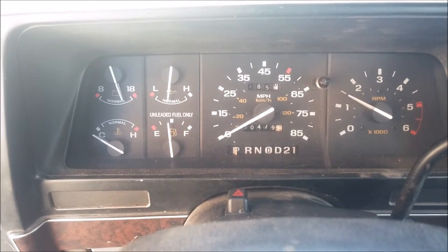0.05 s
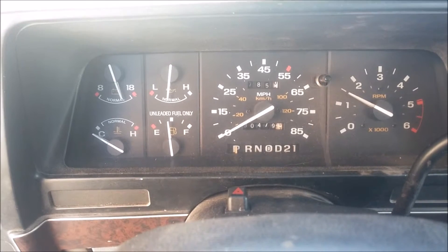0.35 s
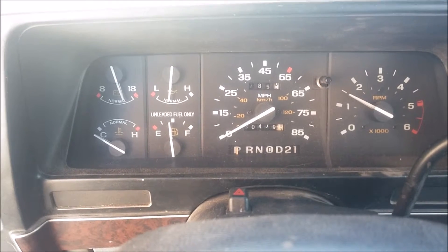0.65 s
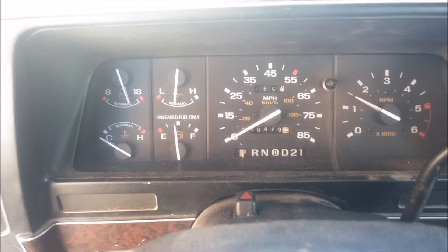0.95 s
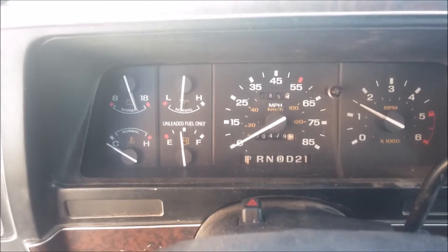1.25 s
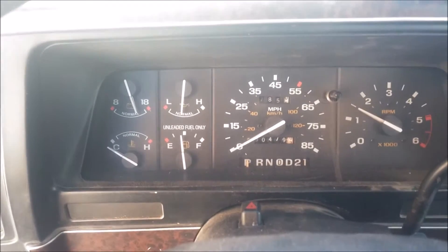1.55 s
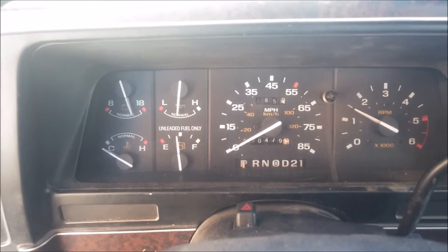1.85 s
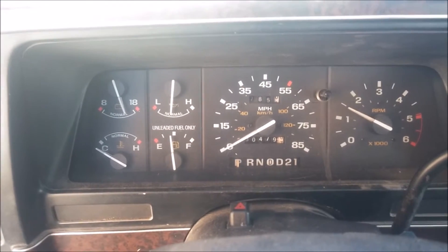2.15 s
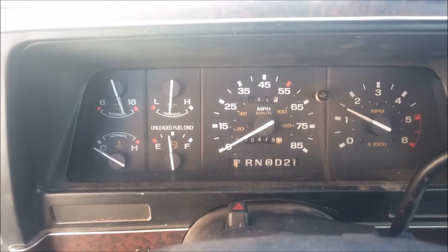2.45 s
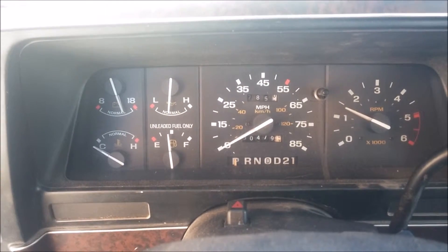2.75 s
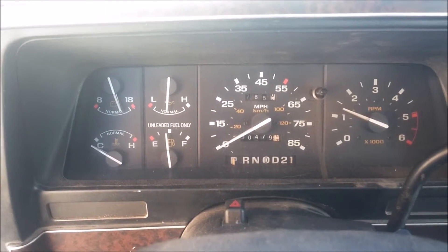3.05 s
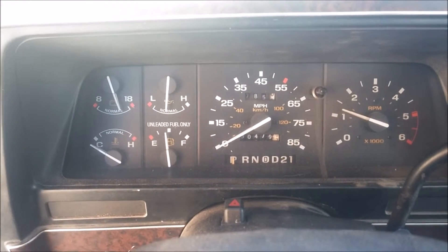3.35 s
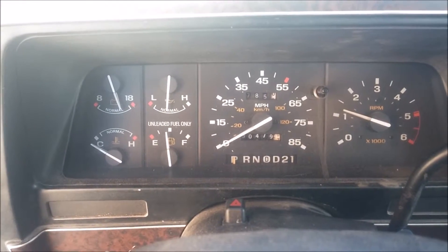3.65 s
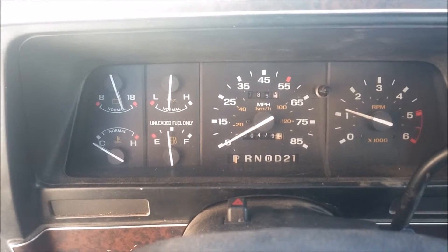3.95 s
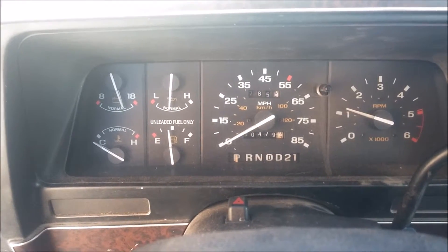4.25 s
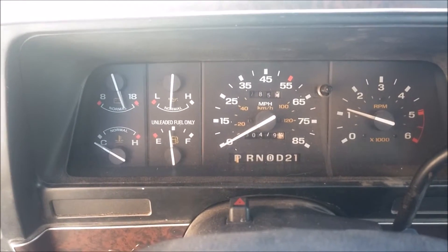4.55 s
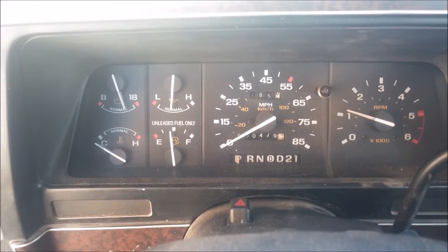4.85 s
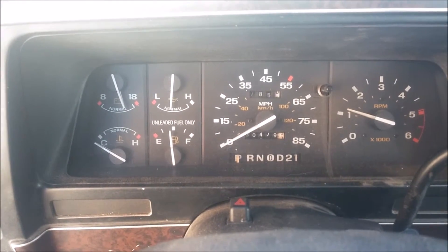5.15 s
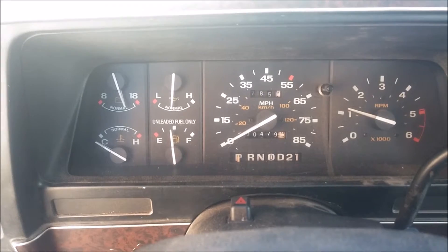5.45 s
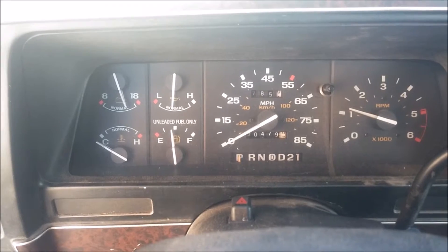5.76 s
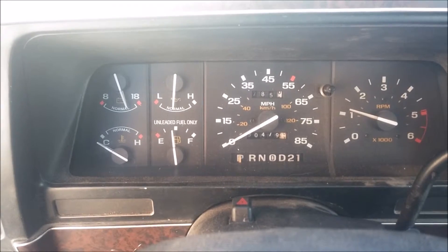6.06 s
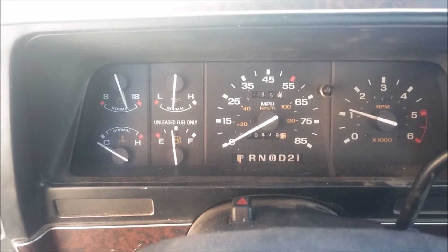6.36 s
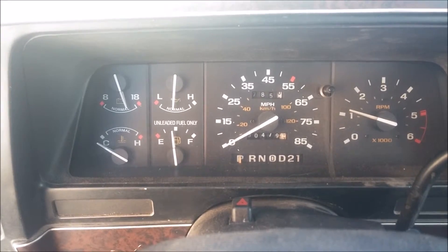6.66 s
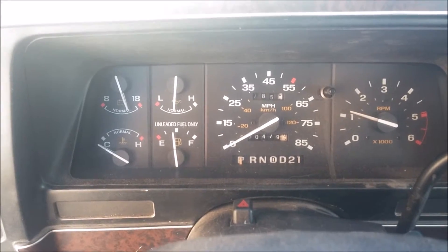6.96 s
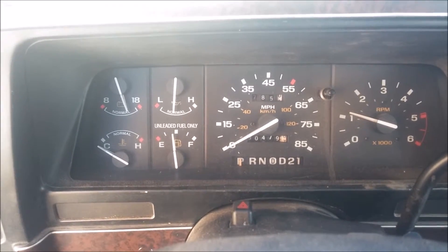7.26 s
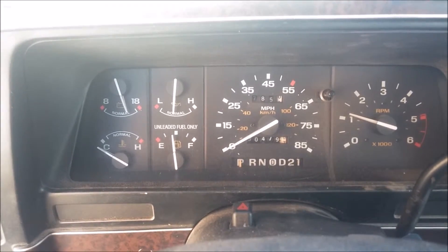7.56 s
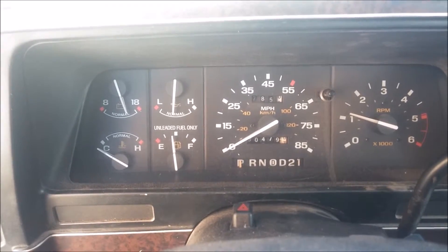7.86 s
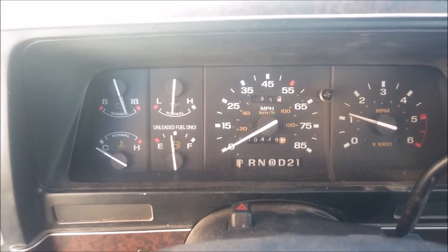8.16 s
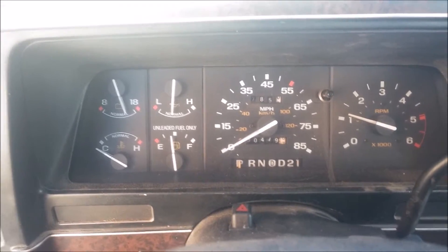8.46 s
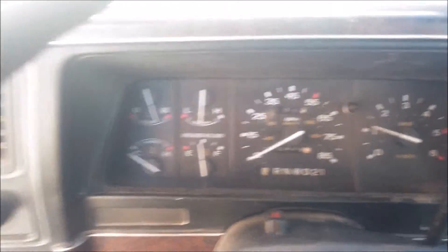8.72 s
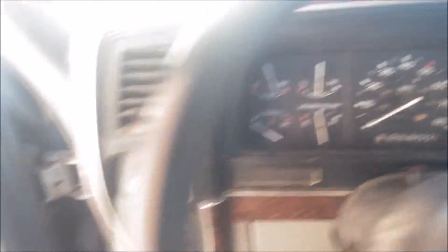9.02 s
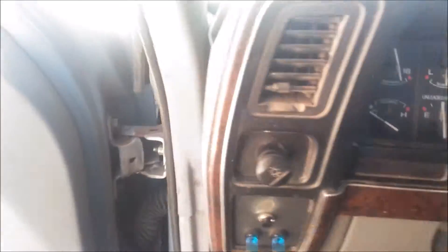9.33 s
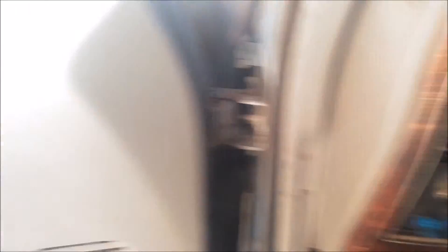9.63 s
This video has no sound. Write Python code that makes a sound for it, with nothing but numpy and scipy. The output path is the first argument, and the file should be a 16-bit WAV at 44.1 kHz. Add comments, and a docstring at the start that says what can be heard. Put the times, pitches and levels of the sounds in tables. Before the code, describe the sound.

A six-cylinder engine runs at a fast idle, heard from the driver's seat as a low drone with a rasp and a buzzing loose part. It soon sinks to a slow, booming idle, with light ticking through the bulkhead and a few faint sleeve brushes. Near the end the microphone swings to the open door, where hiss and engine roar grow and plastic trim knocks several times.

```python
"""A six-cylinder engine at fast idle, heard from the driver's seat, with a rasp and a buzzing loose part.
From about 1.5 s it sinks to a slow idle, and the cab booms as the engine orders slide through its air
modes. Fan, belt drive, valves and ticking tappets come through the bulkhead; a sleeve brushes close by.
After 8 s the microphone swings to the open door, where hiss and roar grow and something knocks."""
import sys
import numpy as np
from scipy import signal
from scipy.fft import rfft, irfft, next_fast_len
from scipy.io import wavfile
from scipy.ndimage import uniform_filter1d, minimum_filter1d

SR = 44100
rng = np.random.default_rng(int(sys.argv[2]) if len(sys.argv) > 2 else 0)


def transcribe(signal):
    """Save signal, clipped to [-1, 1], as a 16-bit WAV file at the path in sys.argv[1]."""
    frames = np.atleast_2d(signal).T
    limited = np.clip(frames, -1, 1)
    pcm = np.round(limited * 32767).astype(np.int16)
    wavfile.write(sys.argv[1], SR, pcm)


N = 436149

# engine speed, one cycle being two turns of the crank: time_s, cycle_hz
ENGINE_SPEED = [(0, 12.19), (.4, 12.29), (.7, 12.2), (1, 12.37), (1.35, 12.33), (1.8, 11.95), (2.4, 11.14),
                (2.7, 10.58), (2.9, 10.09), (3.1, 9.46), (3.3, 9.14), (4.25, 9.3), (4.65, 9.47),
                (5.2, 9.34), (6, 9.33), (8.55, 9.44), (9.89, 9.4)]
SLOW_IDLE_HZ, FAST_IDLE_HZ = 9.35, 12.25
# a deep null and the booming air modes at the driver's seat: centre_hz, width_hz, lift_db
CAB_MODES = [(31.7, 3, -9), (52.84, 4.36, 13.5), (95.94, 17, 13.5), (185, 11, 16.3), (204, 17, 8),
             (280, 28, 12.3)]
# deep orders, 3 the firing of one cylinder bank and 6 of the whole engine: multiple of cycle_hz
BOOM_ORDERS = [3, 4, 6, 9, 12]
# one row per deep order: slow_idle_db, fast_idle_db, change_at_door_db
BOOM_LEVELS = [(-15.6, -21.5, -6), (-35, -18.7, 1), (-18, -22, -9.5), (-17.2, -26.3, 2.5), (-32, -39, 3)]
# the firing note swells and dips as the idle settles: centre_s, half_length_s, change_db
FIRING_SWELLS = [(3.6, .35, 3.5), (4.52, 0.25, -5), (4.9, 0.43, 3.7), (8.2, .9, 1.8)]
# weaker orders, uneven ones from the belt drive, near 23 the slipping fan's blades: multiple of cycle_hz
HUM_ORDERS = [2, 5, 8, 10, 15, 18, 21, 22.8, 23.25, 24, 27, 36, 39, 42, 46.6, 59.5, 116, 163]
# one row per weaker order: slow_idle_db, fast_idle_db
HUM_LEVELS = [(-33, -20.5), (-43, -38), (-52, -43), (-45, -41), (-43, -41), (-38, -34), (-36, -48),
              (-46, -31.7), (-37, -70), (-37, -45), (-59, -33), (-44, -52), (-45, -72), (-46.5, -46),
              (-49, -48), (-58, -44), (-64, -41), (-66, -53)]
# the hum swells and dips as the revs fall and settle: centre_s, half_length_s, change_db
HUM_SWELLS = [(1.95, .3, 4), (2.55, .13, -4), (2.83, .09, 5), (4.6, .3, -4)]
# exhaust rumble in the cab at each idle: frequency_hz, density_db
RUMBLE_SLOW_SPECTRUM = [(12, -9), (23, 1), (32, -4), (47, -2), (70, -5.5), (100, -1.5), (140, .3),
                        (195, -1.5), (222, -4), (235, -11.5), (258, -11.5), (305, -5.5), (360, -13.5),
                        (430, -17.5), (600, -58)]
RUMBLE_FAST_SPECTRUM = [(12, -13), (26, 6), (42, 4), (70, -.5), (100, -1.5), (135, 2.5), (165, 1.2),
                        (205, -1), (245, -10), (305, -4), (360, -11.5), (430, -21), (600, -60)]
# block, valves and air hiss from the driver's seat: frequency_hz, density_db
BLOCK_SPECTRUM = [(250, -31), (380, -1.5), (500, 4.5), (650, 4), (690, 1.5), (760, 3.5), (860, -3),
                  (930, -4.5), (1100, -5.5), (1500, -7.5), (1900, -21.5), (2500, -18.5), (3500, -26.5),
                  (6000, -50)]
VALVE_SPECTRUM = [(500, -41), (1000, -13.5), (1200, -5.5), (1450, -7), (1650, -17), (2000, -27.5),
                  (3200, -23), (4500, -23), (8000, -27.5)]
AIR_SPECTRUM = [(1500, 15.5), (2800, 11.5), (4000, 4), (5000, -0.5), (6000, 6), (6800, -5), (9000, 4),
                (11500, 2), (13000, 0), (14000, 0), (16000, -5)]
# ringing engine parts and panels: centre_hz, width_hz, lift_db
PART_MODES = [(850, 45, 6), (985, 26, 7), (1718, 46, 8), (1915, 46, 7), (2172, 22, 6.5), (2890, 45, 3.5),
              (3083, 24, 7.5), (3555, 46, 9)]
# clatter of each cylinder in firing order: level_db
CYLINDER_DB = [4, 1.5, 3.2, 3.4, 2, 3.5]
# buzz of the loose part, fading as the revs fall: time_s, level_db
RATTLE_LEVEL = [(0, -33.5), (.1, -35.5), (.25, -41.5), (.55, -42), (.7, -38.5), (1.1, -40), (1.28, -36.5),
                (1.5, -46), (2.1, -47), (3, -65)]
# the buzzing part, the singing panel and the throaty rasp: frequency_hz, density_db
RATTLE_SPECTRUM = [(1200, -12), (2000, -4), (2500, -1), (3150, 2), (3800, -4), (6000, -14), (12000, -20),
                   (16000, -25)]
PANEL_SPECTRUM = [(930, -36), (972, -10), (988, 1), (1004, -14), (1060, -44)]
RASP_SPECTRUM = [(450, -14), (540, -4), (720, -3), (930, -9), (1080, -3), (1200, 1.5), (1330, 2),
                 (1450, -1), (1540, -2), (1640, -13), (1750, -10), (2100, -20), (3500, -32)]
# the rasp surges at high revs and again as they fall: centre_s, half_length_s, level_db
RASP_SURGES = [(.5, .55, -27.7), (.73, .07, -30), (1.03, .1, -26.5), (1.24, .05, -31), (1.6, .2, -40),
               (2.1, .33, -33.5)]
# three loose tappets: place_in_cycle (0-1), level_db
LOOSE_TAPPETS = [(.675, 0), (.38, -5.5), (.82, -9)]
# their ticking through the bulkhead: time_s, level_db
TAPPET_LEVEL = [(0, -44), (1.5, -43), (2, -39), (2.8, -44), (3.8, -49), (4.35, -47), (4.65, -39),
                (5.5, -40.5), (6, -39.5), (6.6, -38.5), (7.5, -42), (8.1, -40.5), (9.89, -44)]
# a hand or sleeve near the microphone: centre_s, level_db, half_length_s, pitch_hz, half_width_octaves
BRUSHES = [(1.905, -34, 0.0065, 7000, 0.83), (2.521, -37, 0.021, 5500, 1), (6.568, -46, 0.029, 6450, .08),
           (6.79, -41, .016, 9000, 0.73), (9.836, -24.5, 0.0044, 9800, .08)]
# how much of the outside reaches the microphone as it swings to the door: time_s, level_db
DOOR_EXPOSURE = [(0, -48), (8.2, -22), (8.6, -21), (8.85, -15.5), (9.07, -9), (9.55, -6.5), (9.63, -2),
                 (9.89, 1.5)]
# engine roar and hiss at the open door: frequency_hz, density_db
DOOR_ROAR_SPECTRUM = [(120, -20), (210, 9), (290, 5.5), (380, -1), (500, -10.5), (820, -8.5), (1000, -14),
                      (1350, -14), (1600, -22), (2250, -19), (3200, -39)]
DOOR_HISS_SPECTRUM = [(1000, -13), (2200, 1), (3500, -3), (5000, -4), (7000, -3.5), (10000, -1),
                      (13000, -0.5), (16000, -3)]
# knocks near the door: start_s, level_db, body_share_db, t60_s, click_top_hz
KNOCKS = [(9.103, -27, -15, .03, 5000), (9.1135, -16.5, -20, .025, 6500), (9.252, -32, 10, .05, 1500),
          (9.34, -32, 10, .07, 1500), (9.376, -25, -12, .015, 12000), (9.432, -13, 0, .032, 4500),
          (9.4522, -10, 2.5, .04, 13000), (9.4605, -13, 2.5, .024, 12000), (9.472, -20.5, -4, .06, 8000),
          (9.515, -20, -11, .03, 13000), (9.576, -26, -12, .04, 6000), (9.586, -25, -15, .08, 6500),
          (9.728, -30, 11.5, .11, 2000), (9.786, -30, 11, .06, 2000), (9.862, -32, 10, .06, 2000)]
# hollow panel body and plastic click of a knock: frequency_hz, density_db
KNOCK_BODY_SPECTRUM = [(120, 6), (280, 9), (450, 6.5), (900, 6), (1100, -7), (1800, -26), (3000, -29),
                       (8000, -40)]
KNOCK_CLICK_SPECTRUM = [(700, -15), (1700, 0), (2900, 0), (4000, -2.5), (6000, -5), (6700, -14), (8500, -5),
                        (12000, -4), (16000, -3)]
# plastic trim ringing under each click: centre_hz, width_hz, lift_db
TRIM_MODES = [(2230, 200, 5), (2800, 250, 3), (5650, 600, 6), (11600, 600, 6)]
# reflections off dashboard, windscreen and door: delay_s, gain
CAB_REFLECTIONS = [(.0013, -0.054), (.0031, -0.084), (.0049, .12), (.0083, .12)]


def from_db(db):
    """Decibels to gain."""
    return 10 ** (np.asarray(db) / 20)


def unit_rms(x):
    """Scale to unit rms."""
    return x / np.sqrt(np.mean(x ** 2) + 1e-20)


def curve(rows):
    """A table of time_s and value, read at every sample."""
    times_s, values = np.transpose(rows)
    return np.interp(np.arange(N) / SR, times_s, values)


def swells(rows):
    """Smooth passing humps, summed at every sample."""
    t = np.arange(N) / SR
    return sum(height * np.exp(-((t - centre_s) / half_s) ** 2) for centre_s, half_s, height in rows)


def by_revs(slow_db, fast_db, revs):
    """A level that slides from slow_db to fast_db as revs goes from 0 to 1."""
    return slow_db + (fast_db - slow_db) * revs


def drift(rate_hz):
    """A smooth random wander of unit rms that changes about rate_hz times a second."""
    hop, settle = 100, 1000
    pole = np.exp(-2 * np.pi * rate_hz * hop / SR)
    white = rng.standard_normal(N // hop + settle + 2)
    slow = signal.lfilter([1], [1, -2 * pole, pole * pole], white)[settle:]
    return np.interp(np.arange(N) / hop, np.arange(len(slow)), unit_rms(slow))


def lift(hz, modes):
    """The dB that a set of resonances adds at each frequency."""
    return sum(db / (1 + (2 * (hz - centre) / width) ** 2) for centre, width, db in modes)


def colour(x, spectrum, modes=()):
    """Give a steady sound a broad spectrum with narrow resonances on top; unit rms."""
    size = next_fast_len(N, True)
    hz = np.arange(size // 2 + 1) * SR / size + 1e-3
    points_hz, points_db = np.transpose(spectrum)
    db = np.interp(np.log(hz), np.log(points_hz), points_db, left=-100, right=-100)
    shaped = rfft(x, size) * from_db(db + lift(hz, modes))
    return unit_rms(irfft(shaped, size)[:N])


def noise(spectrum, modes=()):
    """Coloured noise of unit rms."""
    return colour(rng.standard_normal(N), spectrum, modes)


def contacts(cycle, regular_db, size=4096):
    """Dense mechanical contacts: partly chance, partly the same in every cycle."""
    pattern = np.interp(cycle % 1 * size, np.arange(size), rng.standard_normal(size))
    return rng.standard_normal(N) + from_db(regular_db) * pattern


def throb(cycle, bank_depth, firing_depth):
    """A pulsing gain at the firing rates of the nearer cylinder bank and of the whole engine."""
    phase = 2 * np.pi * cycle
    return unit_rms(1 + bank_depth * np.cos(3 * phase) + firing_depth * np.cos(6 * phase))


def exhaust_boom(cycle, cycle_hz, revs, at_door):
    """Deep, clean orders add up to the exhaust's chug; each booms as it crosses a mode of the cab."""
    out = np.zeros(N)
    for order, (slow_db, fast_db, door_db) in zip(BOOM_ORDERS, BOOM_LEVELS):
        db = by_revs(slow_db, fast_db, revs) + lift(order * cycle_hz, CAB_MODES) + door_db * at_door
        if order == len(CYLINDER_DB):
            db += swells(FIRING_SWELLS)
        out += from_db(db) * np.sin(2 * np.pi * order * cycle)
    return np.sqrt(2) * out


def engine_hum(cycle, cycle_hz, revs, flutter_db=1.6, shiver_db=.9, waver_turns=.35):
    """Weaker orders flutter with uneven combustion, shiver at high revs and swell in the cab's modes."""
    out = np.zeros(N)
    shared_db = swells(HUM_SWELLS) + shiver_db * revs * drift(14)
    for order, (slow_db, fast_db) in zip(HUM_ORDERS, HUM_LEVELS):
        db = by_revs(slow_db, fast_db, revs) + lift(order * cycle_hz, CAB_MODES)
        db += flutter_db * drift(4.2) + shared_db
        phase = 2 * np.pi * (order * cycle + rng.random()) + waver_turns * drift(3.4)
        out += from_db(db) * np.sin(phase)
    return np.sqrt(2) * out


def exhaust_rumble(cycle, revs):
    """Low exhaust turbulence fills the cab."""
    slow = np.sqrt(1 - revs) * noise(RUMBLE_SLOW_SPECTRUM)
    fast = np.sqrt(revs) * noise(RUMBLE_FAST_SPECTRUM)
    return (slow + fast) * throb(cycle, bank_depth=.0067, firing_depth=.18)


def block_noise(cycle):
    """Combustion and mechanical noise come through the bulkhead."""
    ringing = colour(contacts(cycle, regular_db=-5), BLOCK_SPECTRUM, PART_MODES)
    return ringing * throb(cycle, bank_depth=.12, firing_depth=.08)


def valve_clatter(cycle, fade_per_firing=.4, uneven_db=1.7):
    """Each cylinder's valves set off a short burst of ringing, a little different every time."""
    firings = cycle * len(CYLINDER_DB)
    count = firings.astype(int)
    db = np.array(CYLINDER_DB)[count % len(CYLINDER_DB)] + uneven_db * rng.standard_normal(N)[count]
    bursts = from_db(db) * np.exp(-fade_per_firing * (firings % 1))
    return colour(bursts * contacts(cycle, regular_db=-4.5), VALVE_SPECTRUM, PART_MODES)


def rasp(cycle):
    """A throaty growl, chopped by the firings, comes in surges."""
    surge = swells([(centre_s, half_s, from_db(db)) for centre_s, half_s, db in RASP_SURGES])
    growl = colour(contacts(cycle, regular_db=-2), RASP_SPECTRUM, PART_MODES)
    return surge * growl * throb(cycle, bank_depth=.2, firing_depth=.3)


def rattle(cycle, place_in_cycle=.54, half_length_cycles=.24):
    """A loose part buzzes once in every cycle, loudest during the fast idle."""
    offset = (cycle - place_in_cycle + .5) % 1 - .5
    burst = unit_rms(np.exp(-(offset / half_length_cycles) ** 2))
    return from_db(curve(RATTLE_LEVEL)) * burst * noise(RATTLE_SPECTRUM, PART_MODES)


def tappets(cycle, contacts_per_tick=3, spread_cycles=.024, uneven_db=1.3, chatter_db=-4):
    """Each loose tappet ticks once a cycle and pings the valve cover, which chatters in between."""
    ticks = np.zeros(N)
    cycle_starts = np.arange(int(cycle[-1]))[:, None]
    for place, db in LOOSE_TAPPETS:
        scatter = spread_cycles * rng.standard_normal((len(cycle_starts), contacts_per_tick))
        at = np.minimum(np.searchsorted(cycle, cycle_starts + place + scatter), N - 1)
        ticks[at] += from_db(db + uneven_db * rng.standard_normal(cycle_starts.shape))
    cover = signal.butter(2, [1265, 1395], "band", fs=SR, output="sos")
    pings = unit_rms(signal.sosfilt(cover, ticks))
    chatter = unit_rms(signal.sosfilt(cover, rng.standard_normal(N)))
    return from_db(curve(TAPPET_LEVEL)) * unit_rms(pings + from_db(chatter_db) * chatter)


def singing_panel(revs, full_at_revs=.55):
    """A panel sings near 990 Hz, at full strength while the revs are high."""
    drive = np.minimum(revs / full_at_revs, 1)
    return from_db(by_revs(-57, -40.8, drive)) * noise(PANEL_SPECTRUM)


def air_hiss(revs, flicker_db=.8):
    """Air hisses in the cab with a slight flicker, louder at high revs."""
    return from_db(by_revs(-41.5, -38, revs) + flicker_db * drift(16)) * noise(AIR_SPECTRUM, PART_MODES)


def sleeve_brushes():
    """Friction of a hand or sleeve makes faint brushes and squeaks close to the microphone."""
    out = np.zeros(N)
    for centre_s, db, half_s, hz, octaves in BRUSHES:
        span = np.arange(int((centre_s - 3 * half_s) * SR), int((centre_s + 3 * half_s) * SR))
        edges_hz = np.clip([hz / 2 ** octaves, hz * 2 ** octaves], 100, .45 * SR)
        band = signal.butter(2, edges_hz, "band", fs=SR, output="sos")
        friction = unit_rms(signal.sosfilt(band, rng.standard_normal(len(span))))
        out[span] += from_db(db) * np.exp(-((span / SR - centre_s) / half_s) ** 2) * friction
    return out


def door_roar(exposure_db, follow_share=.93):
    """The engine's deep roar bends round the door, so it follows only a share of the swing."""
    return from_db(-20.5 + follow_share * exposure_db) * noise(DOOR_ROAR_SPECTRUM)


def door_hiss(exposure_db, flicker_db=.8):
    """A flickering hiss from outside grows as the microphone nears the door."""
    return from_db(-31 + exposure_db + flicker_db * drift(21)) * noise(DOOR_HISS_SPECTRUM)


def door_knocks(click_db=-2.5):
    """Short blows: a hollow panel body under a plastic click whose brightness differs from knock to knock."""
    t, out = np.arange(N) / SR, np.zeros(N)
    body = noise(KNOCK_BODY_SPECTRUM)
    click = from_db(click_db) * noise(KNOCK_CLICK_SPECTRUM, TRIM_MODES)
    for start_s, db, body_db, t60_s, top_hz in KNOCKS:
        at = int(start_s * SR)
        contact = signal.sosfilt(signal.butter(2, top_hz, fs=SR, output="sos"), click[at:])
        decay = from_db(db - 60 * t[:N - at] / t60_s)
        out[at:] += decay * (from_db(body_db) * body[at:] + contact)
    return out


def cab_reflections(x):
    """Hard surfaces close to the microphone comb the treble."""
    n = np.arange(N)
    return x + sum(gain * np.interp(n - delay_s * SR, n, x, left=0) for delay_s, gain in CAB_REFLECTIONS)


def scene():
    """One microphone in the cab: the engine follows the crank; the door lets in clatter, roar, hiss."""
    cycle_hz, exposure_db = curve(ENGINE_SPEED), curve(DOOR_EXPOSURE)
    cycle = np.cumsum(cycle_hz) / SR
    revs = np.clip((cycle_hz - SLOW_IDLE_HZ) / (FAST_IDLE_HZ - SLOW_IDLE_HZ), 0, 1)
    engine = exhaust_boom(cycle, cycle_hz, revs, at_door=from_db(exposure_db))
    engine += engine_hum(cycle, cycle_hz, revs)
    engine += from_db(by_revs(-22.6, -15.8, revs)) * exhaust_rumble(cycle, revs)
    engine += from_db(by_revs(-32.5, -26, revs)) * block_noise(cycle)
    clatter = valve_clatter(cycle)
    engine += from_db(by_revs(-38.5, -32, revs)) * clatter   # through the bulkhead
    engine += from_db(-38 + exposure_db) * clatter   # through the open door
    engine += rasp(cycle) + rattle(cycle) + tappets(cycle) + singing_panel(revs)
    engine += door_roar(exposure_db)
    nearby = air_hiss(revs) + door_hiss(exposure_db) + door_knocks() + sleeve_brushes()
    return (engine + cab_reflections(nearby))[None]


def record(dry):
    """The microphone loses the deepest bass, a fast limiter holds the peaks and the top is cut."""
    ceiling, window_samples, top_hz = .95, 221, 15850
    heard = signal.sosfilt(signal.butter(1, 15, "high", fs=SR, output="sos"), dry)
    allowed = ceiling / np.maximum(np.abs(heard), ceiling)
    gain = uniform_filter1d(minimum_filter1d(allowed, window_samples), window_samples)
    return signal.sosfilt(signal.ellip(10, .1, 80, top_hz, fs=SR, output="sos"), heard * gain)


dry = scene()
out = record(dry)
transcribe(out)
```